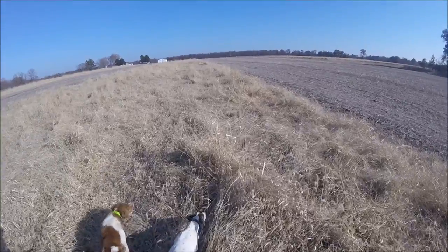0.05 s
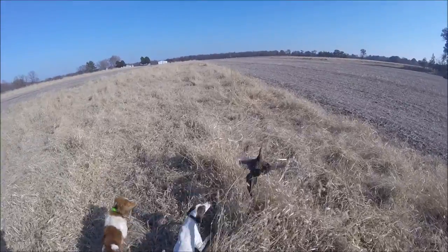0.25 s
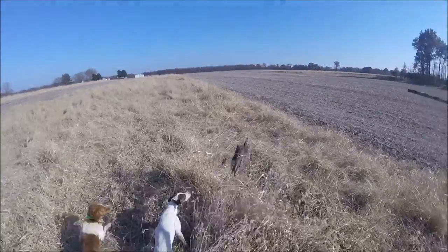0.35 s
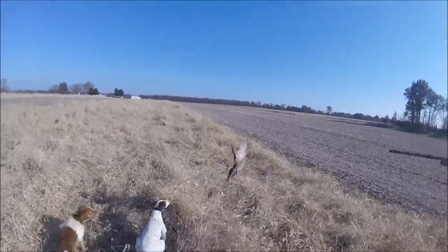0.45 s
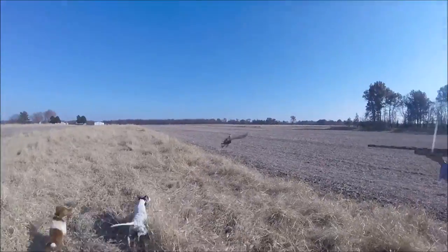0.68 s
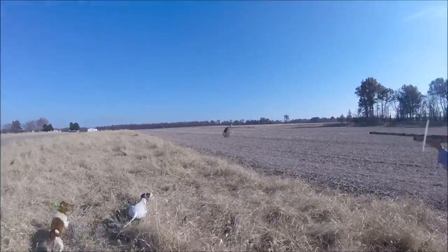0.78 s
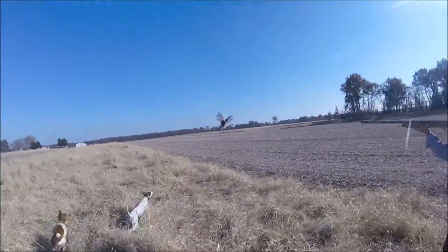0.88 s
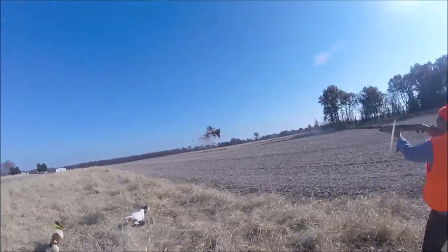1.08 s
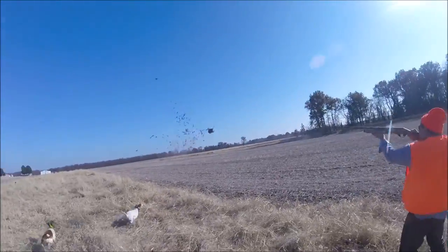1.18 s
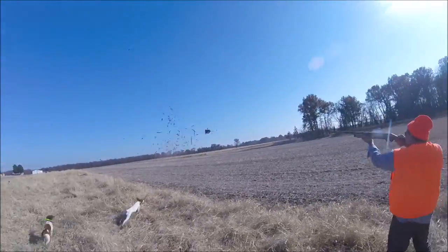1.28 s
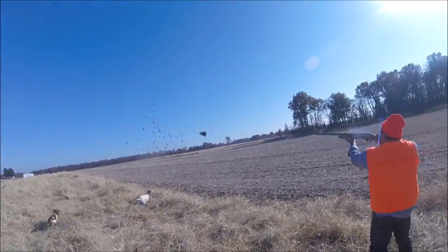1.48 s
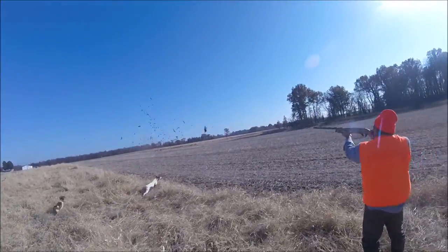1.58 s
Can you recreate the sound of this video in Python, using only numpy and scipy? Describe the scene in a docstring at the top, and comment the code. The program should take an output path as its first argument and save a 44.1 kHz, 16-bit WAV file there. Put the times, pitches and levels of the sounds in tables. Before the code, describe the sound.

A single loud shotgun shot ends a bird's takeoff in an open field. First dry grass crackles and quick wingbeats swell and fade, with wind and bumps on a small, tinny microphone; then the shot cracks and rolls away.

```python
"""An open field: a game bird thrashes out of dry grass and climbs away on clapping, whistling wings.
Blades hiss and crackle, stems snap and wind rumbles on the microphone. The sound cuts out for an
instant, then one shotgun blast cracks, scatters over the stubble and rolls back from distant trees.
All is heard through a small body-worn camera that takes a few knocks and rings in the treble."""
import sys
import numpy as np
from scipy import signal
from scipy.fft import rfft, irfft
from scipy.io import wavfile
from scipy.ndimage import uniform_filter1d

SR = 44100
rng = np.random.default_rng(int(sys.argv[2]) if len(sys.argv) > 2 else 0)


def materialize(psi):
    """Save the field psi as 16-bit PCM at rate SR to the path in sys.argv[1].

    A 1-D psi becomes a single channel; in a 2-D psi each row is a channel.
    """
    bounded = np.clip(np.atleast_2d(psi).T, -1, 1)
    quanta = np.round(bounded * 32767).astype(np.int16)
    wavfile.write(sys.argv[1], SR, quanta)


N = 72765
T = np.arange(N) / SR

# wingbeats: (time [s], clap pitch [Hz], clap level [dB], swish level [dB], air push level [dB])
WINGBEATS = [(.221, 795, -40, -31, -54), (.243, 698, -42, -36, -51), (0.304, 702, -32, -33, -50),
             (.317, 849, -33, -30.5, -54), (.353, 680, -31, -32, -29), (.427, 800, -26, -27.5, -22),
             (.503, 691, -20, -27, -25), (.576, 760, -17.5, -26.5, -28), (.650, 699.5, -24, -28.5, -24.5),
             (.725, 690.5, -27.5, -30, -27.5), (.799, 692, -25.5, -29, -26), (.874, 710, -30, -33, -29.5),
             (.949, 686, -31, -33, -28), (1.025, 729, -33, -35, -28), (1.102, 694, -36, -41, -35.5)]
# tone of the feathers' swish and of the soft upstroke: (frequency [Hz], level [dB])
SWISH_EQ = [(150, -17), (450, 5), (900, 7), (1200, -4), (1700, -1.5), (2500, -4.5), (3400, -2.5),
            (4500, -10.5), (8000, -16), (13000, -20)]
UPSTROKE_EQ = [(80, -22), (250, -3), (480, -1), (800, -12), (2000, -22), (8000, -27)]
# muzzle blast and its reflections: (delay [s], level [dB], push length [s], brightness [Hz])
BLASTS = [(0, 0, .0008, 7500), (.0003, -15, .0055, 2500), (.0013, -6, 0.00026, 8000),
          (.0053, -4.5, .0004, 3000), (.0072, -24, 0.0005, 2500), (0.0165, -13.5, .0005, 1800),
          (.0208, -13, .0005, 2200), (.048, -32, 0.0031, 1500), (0.1278, -28, 0.0035, 1800)]
# tone of the shot's crack, grass splash, early scatter, tail and roll: (frequency [Hz], level [dB])
CRACK_EQ = [(200, -26), (800, 5), (1500, -2), (3200, 6), (5200, -10), (7500, -2), (9200, -13), (11500, -19),
            (14000, -2.5)]
SPLASH_EQ = [(200, -21), (1500, 4), (3000, -6), (6000, -1.5), (9000, -4), (13000, -22)]
SCATTER_EQ = [(30, -11), (100, 12), (160, -3), (300, 1), (850, 3), (1400, -3), (3000, -7), (6000, -22),
              (9000, -11), (13000, -31)]
TAIL_EQ = [(50, 6), (200, -1.5), (850, 4), (1400, -3), (3000, -8), (6000, -15), (9000, -11.5), (13000, -29)]
ROLL_EQ = [(40, -14), (110, -11), (200, 1), (350, 2.5), (550, -14.5), (1000, -19.5), (2000, -28.5),
           (8000, -33.5)]
# swells of the roll from the distant trees: (time [s], level [dB])
ROLL_ENVELOPE = [(1.25, -59), (1.36, -51), (1.43, -58), (1.478, -50.5), (1.53, -59.5), (1.65, -59)]
# stir of the dry grass: (time [s], relative level [dB])
GRASS_ENVELOPE = [(0, -34), (.03, -42), (.168, -42.5), (.226, -26), (.256, -29.5), (.302, -24.5),
                  (.317, -24), (.338, -28), (.505, -31), (.586, -24), (.655, -29.5), (.786, -28.5),
                  (1.0, -30.5), (1.155, -35), (1.21, -54), (1.43, -65.5), (1.53, -59.5), (1.572, -52),
                  (1.65, -57.5)]
# tone of dry blades and stems: (frequency [Hz], level [dB])
GRASS_EQ = [(100, 3.5), (300, -1), (700, -4.5), (1400, -5), (3000, -1.5), (4300, -6), (6000, -3),
            (7500, -1), (9500, 4), (12600, -2), (13800, -28)]
# snapping stems: (time [s], relative level [dB])
STEM_SNAPS = [(.128, -27), (0.219, -33), (.248, -11.5), (.3005, -28), (0.314, -11), (.3168, -17),
              (0.43, -23), (0.4447, -14), (.546, -14), (.559, -22), (.588, -18)]
# the bird's thrashing in the cover: (time [s], level [dB])
THRASH_ENVELOPE = [(.17, -55), (.232, -33), (.27, -44.5), (.31, -30), (.37, -42.5), (.44, -37), (.6, -62),
                   (.75, -53), (1.15, -63)]
# its low, woody tone: (frequency [Hz], level [dB])
THRASH_EQ = [(40, -18), (130, 0), (250, 1), (450, 1), (700, -9.5), (1200, -5.5), (2200, -12), (5000, -20),
             (13000, -52)]
# brief dips in the body of the rustle: (time [s], gain [dB])
RUSTLE_DIPS = [(0.111, -19), (0.685, -7), (1.074, -16.5)]
# knocks on the camera: (time [s], level [dB])
BUMPS = [(.366, -28), (.3983, -12), (.435, -25.5), (.556, -27.5)]
# gusts on the microphone: (time [s], level [dB])
WIND_ENVELOPE = [(0, -49.5), (.18, -48), (.25, -44), (.34, -45), (.41, -25.5), (.5, -35), (.7, -39),
                 (1.15, -43), (1.21, -64), (1.65, -62)]
# their rumbling tone: (frequency [Hz], level [dB])
WIND_EQ = [(15, -10), (42, 0), (85, -2), (135, -13.5), (220, -14), (400, -25), (1000, -37), (4000, -73)]
# resonances of the housing: (frequency [Hz], width [Hz], send level [dB])
HOUSING_RINGS = [(5144, 540, 8.5), (6505, 275, 11)]
# response of the microphone: (frequency [Hz], gain [dB])
MICROPHONE_EQ = [(20, -0.5), (4000, -2.5), (7500, 1.5), (9300, -3.5), (10300, -9), (11500, -20.5),
                 (12600, -20.5), (13500, -36), (15500, -29)]

CUT_S, CUT_DB, SHOT_S = 1.158, -29.5, 1.2046


def wings():
    """Each beat is a soft upstroke, a hollow clap with a whistling swish, and a shove of air."""
    whistle_hz, upstroke_lead_s, push_lag_s = 3500, .019, .0092
    out, swish, upstroke = np.zeros((3, N))
    rasp = drift(280) + 1j * drift(280)  # widens the whistle into a breathy band
    ruffle = 1 + .35 * drift(300)
    for (s, clap_hz, clap_db, swish_db, push_db), phase in zip(WINGBEATS, rng.random(len(WINGBEATS))):
        age = np.clip(T - s, -.02, .02)
        clap_pitch = clap_hz * np.exp(-14 * age)  # clap and whistle both sag through the stroke
        whistle_pitch = whistle_hz * np.exp(-27 * age)
        angle = 2 * np.pi * (np.cumsum(clap_pitch) / SR + phase)
        hollow = np.sin(angle) + from_db(-8) * np.sin(.66 * angle)
        out += from_db(clap_db) * swell(s, rise_s=.0018, fall_s=.003) * hollow * ruffle
        lift_s = s - upstroke_lead_s
        out += from_db(push_db) * (air_push(s + push_lag_s) + from_db(-10) * air_push(lift_s))
        stroke = from_db(swish_db) * swell(s, rise_s=.003, fall_s=.0065)
        whistle = rasp * np.exp(2j * np.pi * np.cumsum(whistle_pitch) / SR)
        out += from_db(-7) * stroke * whistle.real
        swish += stroke
        upstroke += from_db(clap_db - 13.5) * swell(lift_s, rise_s=.0077, fall_s=.0077)
    return out + swish * noise(SWISH_EQ) + upstroke * noise(UPSTROKE_EQ)


def air_push(s, width_s=.0056):
    """The weight of a wingbeat: one smooth shove of air between two shallow dips."""
    u = ((T - s) / width_s) ** 2
    return (1 - u) * fade(u / 2)


def shotgun():
    """The muzzle blast, its suction and reflections, scatter off the field, a low roll from the trees."""
    blasts = sum(blast(SHOT_S + delay, db, push_s, hz) for delay, db, push_s, hz in BLASTS)
    suction = from_db(-24.5) * swell(SHOT_S + .011, rise_s=.0074, fall_s=.0051)
    rebound = from_db(-34) * swell(SHOT_S + .032, rise_s=.007, fall_s=.025)
    crack = from_db(-12) * decay(SHOT_S, fall_s=.0024) * noise(CRACK_EQ)
    # a bright splash comes straight back off the nearby grass
    splash = from_db(-35.5) * swell(SHOT_S + .019, rise_s=.0065, fall_s=.0041) * noise(SPLASH_EQ)
    scatter = from_db(-24) * decay(SHOT_S, fall_s=.015) * noise(SCATTER_EQ)
    tail = from_db(-34.5) * decay(SHOT_S, fall_s=.066) * noise(TAIL_EQ)
    roll = envelope(ROLL_ENVELOPE) * noise(ROLL_EQ)
    return (T >= SHOT_S) * (blasts - suction + rebound + crack + splash + scatter + tail + roll)


def blast(s, db, push_s, bright_hz):
    """The punch: a shock front, then pressure that falls through zero into suction."""
    age = np.maximum(T - s, 0) / push_s
    pressure = (T >= s) * (1 - age) * fade(age) + 1e-18
    pole = np.exp(-2 * np.pi * bright_hz / SR)  # a low-pass rounds off the front
    return from_db(db) * signal.lfilter([1 - pole], [1, -pole], pressure)


def grass():
    """Countless dry blades crackle and hiss; now and then a stem snaps."""
    crackles_per_s, spread_db, hiss_db, flutter_db = 3500, 1.5, .5, .84
    sizes = from_db(spread_db * np.minimum(rng.exponential(1, N), 5)) * rng.choice([-1, 1], N)
    crackle = unit_rms(sizes * (rng.random(N) < crackles_per_s / SR))
    hiss = from_db(hiss_db) * rng.standard_normal(N)
    blades = unit_rms(equalise(crackle + hiss, GRASS_EQ))
    snaps = sum(from_db(db) * decay(s, fall_s=.00077) for s, db in STEM_SNAPS) * noise(GRASS_EQ)
    stir = envelope(GRASS_ENVELOPE) * from_db(2 + flutter_db * drift(55))
    return (blades * stir + snaps) / 2


def thrash():
    """The bird beats through the cover in low bursts of noise."""
    gate = (T > THRASH_ENVELOPE[0][0]) * (T < CUT_S)
    return gate * envelope(THRASH_ENVELOPE) * noise(THRASH_EQ)


def duck_body(rustle, below_hz=3800, width_s=.0088):
    """The rustle thins out three times as everything below the treble dips briefly."""
    body = signal.sosfiltfilt(signal.butter(3, below_hz, fs=SR, output="sos"), rustle)
    dip_db = sum(db * np.exp(-((T - s) / width_s) ** 2) for s, db in RUSTLE_DIPS)
    return rustle + body * (from_db(dip_db) - 1)


def bumps():
    """Knocks on the camera as it swings after the bird: a tick, and a pitch that dives into a thud."""
    thud_hz, dive_hz, dive_s = 72, 302, .0023
    out = np.zeros(N)
    for s, db in BUMPS:
        age = np.maximum(T - s, 0)
        cycles = thud_hz * age + dive_hz * dive_s * (1 - fade(age / dive_s))
        thud = decay(s, fall_s=.013) * np.sin(2 * np.pi * cycles)
        tick = from_db(-2) * decay(s, fall_s=.00059)
        out -= from_db(db) * (thud + tick)
    return out


def wind():
    """Wind buffets the microphone: a low bed of rumble with one strong gust."""
    return envelope(WIND_ENVELOPE) * noise(WIND_EQ)


def from_db(db):
    """Decibels to gain."""
    return 10 ** (np.asarray(db) / 20)


def unit_rms(x):
    """Scale to unit rms."""
    return x / np.sqrt(np.mean(x ** 2) + 1e-20)


def envelope(points):
    """A fader ride through (time [s], level [dB]) points."""
    return from_db(np.interp(T, *np.transpose(points)))


def equalise(x, curve, size=8192):
    """Minimum-phase EQ through (frequency [Hz], gain [dB]) points, so nothing rings ahead of a hit."""
    hz, db = np.transpose(curve)
    log_bins = np.log(np.fft.rfftfreq(size, 1 / SR) + 1)
    gain = from_db(np.interp(log_bins, np.log(hz), db))
    cepstrum = irfft(np.log(gain))
    cepstrum[1:size // 2] *= 2
    cepstrum[size // 2 + 1:] = 0
    impulse = irfft(np.exp(rfft(cepstrum)))
    return signal.fftconvolve(x, impulse)[:N]


def noise(curve):
    """Coloured noise of unit rms."""
    return unit_rms(equalise(rng.standard_normal(N), curve))


def drift(hz):
    """Random wobble of unit rms, rolled off above hz."""
    lowpass = signal.butter(2, hz, fs=SR, output="sos")
    return unit_rms(signal.sosfilt(lowpass, rng.standard_normal(2 * N))[N:])


def decay(s, fall_s):
    """Hard attack at s, exponential release."""
    return (T >= s) * fade(np.abs(T - s) / fall_s)


def swell(s, rise_s, fall_s):
    """Soft attack to a peak at s, exponential release."""
    return fade(np.where(T < s, ((T - s) / rise_s) ** 2, (T - s) / fall_s))


def fade(u):
    """Exponential fall, held once it is far below hearing."""
    return np.exp(-np.minimum(u, 30))


def scene():
    """Grass, bird and wind, a brief hush, then the shot, all over a faint noise floor."""
    field = duck_body(grass() + thrash()) + wings() + bumps() + wind()
    gap = 1.0 * ((T > CUT_S) & (T < SHOT_S))
    hush = from_db(CUT_DB * uniform_filter1d(gap, size=64))
    return (hush * field + shotgun() + from_db(-77) * noise(TAIL_EQ))[None]


def record(dry):
    """The housing rings, the microphone dulls the top, the shot's peak overloads."""
    ceiling, cutoff_hz = .85, 14562
    out = dry[0]
    for hz, width_hz, db in HOUSING_RINGS:
        ring = signal.lfilter(*signal.iirpeak(hz, hz / width_hz, fs=SR), dry[0])
        out = out + from_db(db) * ring
    out = np.clip(equalise(out, MICROPHONE_EQ), -ceiling, ceiling)
    return signal.sosfilt(signal.ellip(8, .5, 80, cutoff_hz, fs=SR, output="sos"), out)[None]


dry = scene()
out = record(dry)
materialize(out)
```